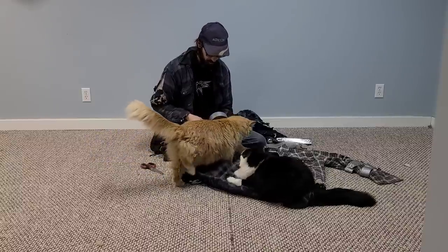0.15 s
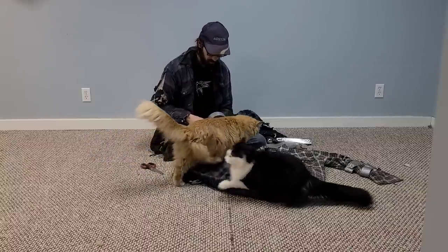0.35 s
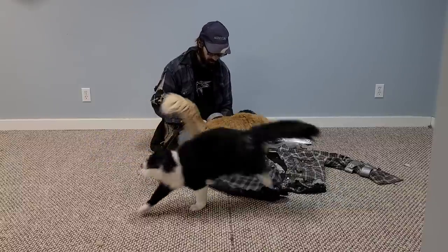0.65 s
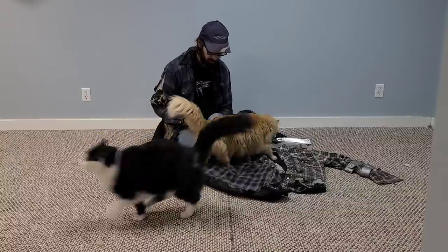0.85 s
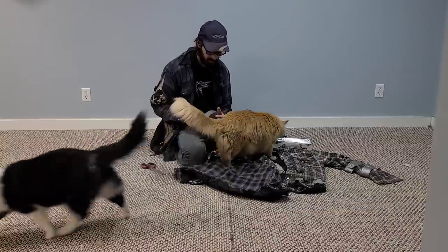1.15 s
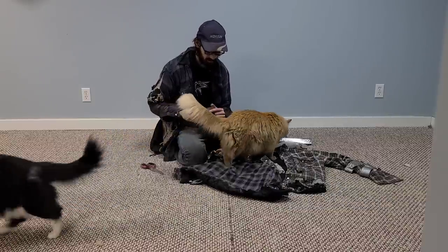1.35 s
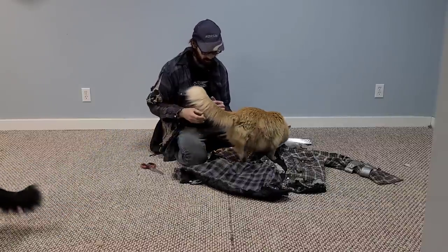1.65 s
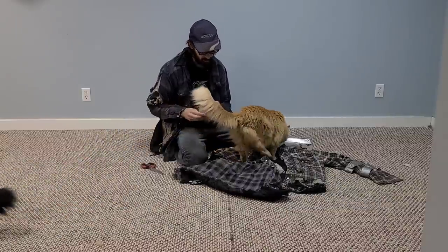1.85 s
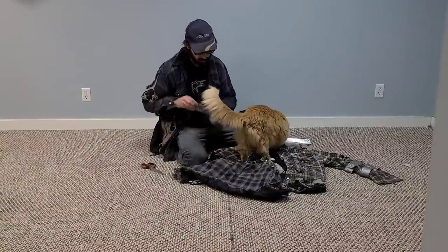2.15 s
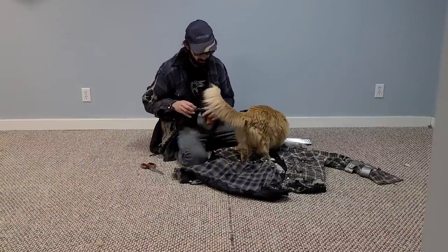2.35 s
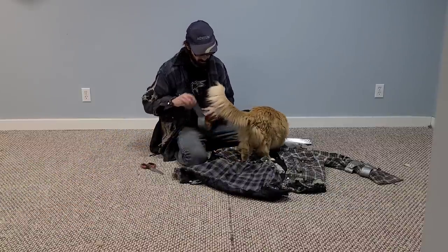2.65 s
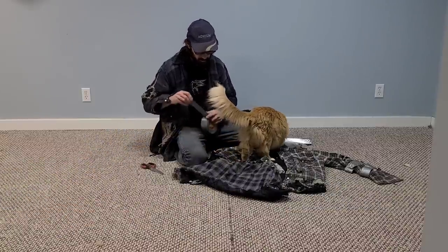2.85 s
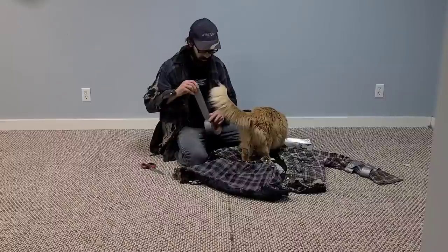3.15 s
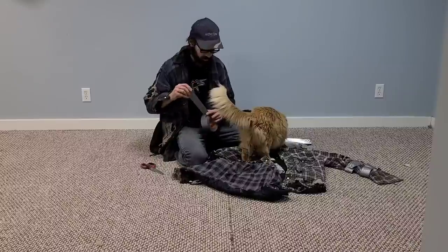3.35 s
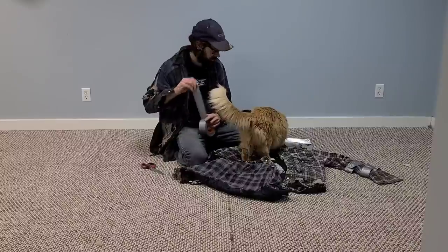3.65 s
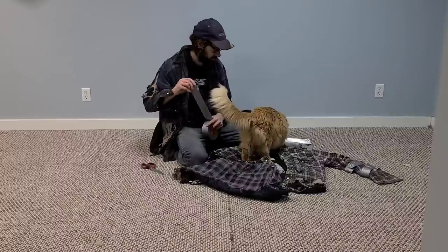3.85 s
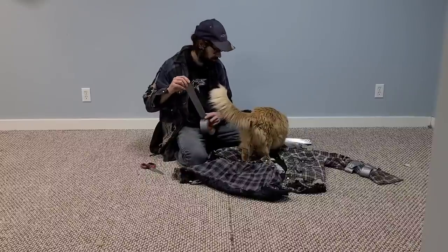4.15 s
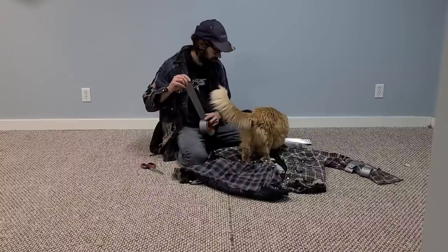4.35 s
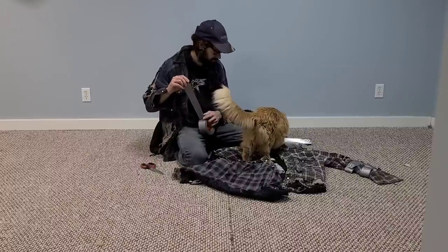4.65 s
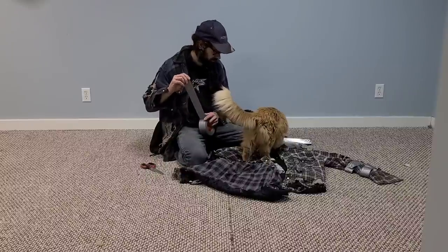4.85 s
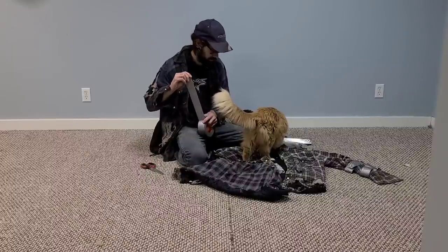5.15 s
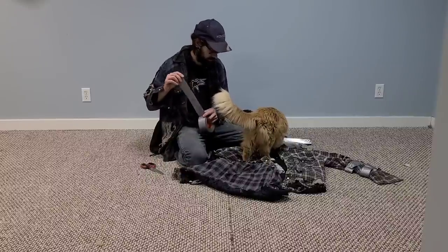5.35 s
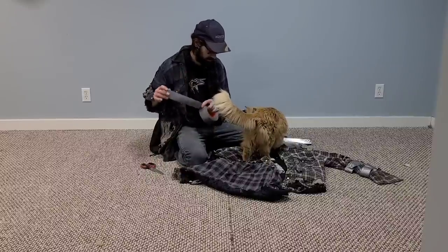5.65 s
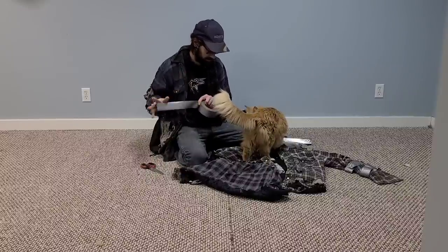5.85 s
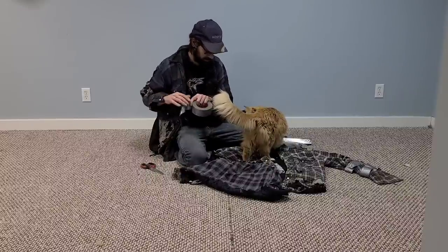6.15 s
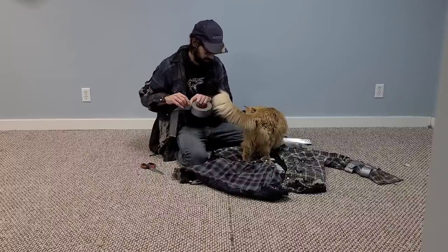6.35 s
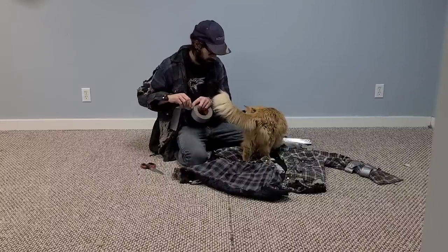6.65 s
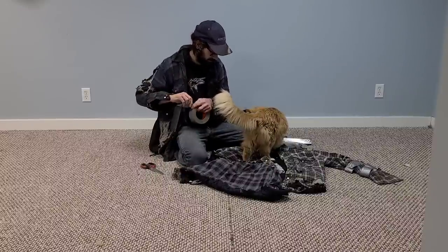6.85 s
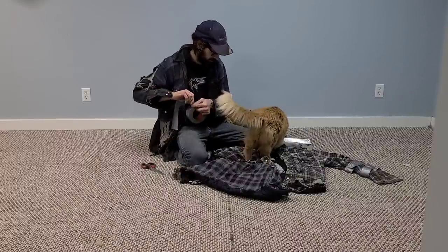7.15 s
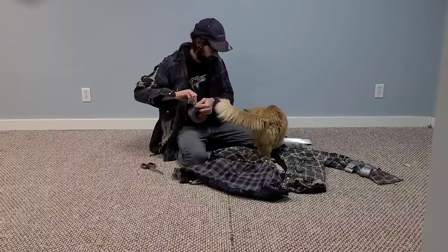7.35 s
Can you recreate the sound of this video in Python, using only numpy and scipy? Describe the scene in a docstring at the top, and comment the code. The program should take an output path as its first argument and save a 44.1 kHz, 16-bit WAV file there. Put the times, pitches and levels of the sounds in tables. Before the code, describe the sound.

A low electrical hum and soft ventilation fill a small room, heard in stereo from a few metres away. After a light tick and a single dull thump, someone eases duct tape from a roll in separate little bursts: pops, crackles, a quick squeal and a short groan, mixed with sleeve rustle. The handling turns faint, then one sharp, squealing rip closes it. Hard walls add a short echo.

```python
"""Duct tape is worked off its roll in a small carpeted room, a few metres from a stereo microphone.
Snapping threads of glue make the stretched strip pop, crackle and rip; stick-slip makes it squeal and
groan. The strip crinkles, hands and sleeves rub, and one dull thump is the loudest sound.
Hard walls answer each burst, over a steady mains hum, a faint drone and the rush of ventilation."""
import sys
import numpy as np
from scipy import signal
from scipy.fft import rfft, irfft
from scipy.io import wavfile
from scipy.ndimage import uniform_filter1d

SR = 44100
rng = np.random.default_rng(int(sys.argv[2]) if len(sys.argv) > 2 else 0)


def put_to_file(sound):
    """Save the sound as 16-bit audio at rate SR, in the file named by the first command-line argument."""
    columns = np.atleast_2d(sound).T  # one column per channel
    safe = np.clip(columns, -1, 1)
    whole_steps = np.round(safe * 32767)
    wavfile.write(sys.argv[1], SR, whole_steps.astype(np.int16))


N = 330109
TOP_HZ = 15900


def undb(db):
    """Decibels to gain."""
    return 10 ** (np.asarray(db) / 20)


def unit_rms(x):
    """Scale to rms 1."""
    return x / np.sqrt(np.mean(x ** 2))


def at_hz(points, hz):
    """Read (Hz, value) points on a log-frequency axis."""
    point_hz, value = np.transpose(points)
    return np.interp(np.log(hz + 1), np.log(point_hz), value)


def colour(x, points, size=4096):
    """Minimum-phase filter with a (Hz, dB) response."""
    gain = undb(at_hz(points, np.fft.rfftfreq(size, 1 / SR)))
    cepstrum = irfft(np.log(gain))
    cepstrum[1:size // 2] *= 2
    cepstrum[size // 2 + 1:] = 0
    return signal.oaconvolve(x, irfft(np.exp(rfft(cepstrum))))[:len(x)]


def cut(x, hz, kind, order=2):
    """High- or low-pass."""
    return signal.sosfilt(signal.butter(order, min(hz, TOP_HZ), kind, fs=SR, output="sos"), x)


def wander(rate_hz):
    """Smooth random curve, rms 1."""
    hold = max(int(SR / rate_hz), 1)
    steps = np.repeat(rng.standard_normal(N // hold + 1), hold)
    return unit_rms(uniform_filter1d(steps, hold)[:N])


def burst(peak_s, rise_s, fall_s):
    """Envelope: exponential rise to 1, exponential fall."""
    t = np.arange(N) / SR - peak_s
    return np.exp(np.maximum(np.minimum(t / rise_s, -t / fall_s), -40))


def swells(rows):
    """Sum of symmetric bursts."""
    return sum(undb(db) * burst(peak_s, width_s, width_s) for peak_s, width_s, db in rows)


def add(out, start_s, x):
    """Mix x into out at start_s."""
    i = int(start_s * SR)
    out[i:i + len(x)] += x[:N - i]


# Mains and appliance tones. Each row: frequency in Hz, rms level in dB.
HUM_TONES = [(60, -74.5), (120, -57), (284, -73.5), (355, -78.5), (507, -79.5), (765, -77.5),
             (14196, -95.5)]
# Each row: peak time in seconds, rise and fall in seconds, level in dB.
DRONE_SWELLS = [(1.55, 0.29, -62.5), (4.13, 0.11, -61.5), (7.22, 0.17, -60.5)]
# Ventilation and microphone hiss. Each row: frequency in Hz, relative level in dB.
AIR_SPECTRUM = [(20, -28.5), (58, 2.5), (150, 2.5), (215, -6.5), (290, -3), (450, -8.5), (780, -9.5),
                (900, -16.5), (1250, -12.5), (2100, -21), (3300, -20), (5400, -33.5), (8000, -41),
                (15000, -42.5)]

def background(air_db=-61, drone_hz=362, wobble=0.03026, balance_db=-0.3):
    """Steady mains hum, a wavering drone and ventilation whose bass is alike in both channels."""
    t = np.arange(N) / SR
    hum = sum(np.sqrt(2) * undb(db) * np.sin(2 * np.pi * hz * t) for hz, db in HUM_TONES)
    drone_phase = 2 * np.pi * drone_hz * np.cumsum(1 + wobble * wander(60)) / SR
    drone = unit_rms(np.sin(drone_phase)) * swells(DRONE_SWELLS)
    mid, side = (unit_rms(colour(rng.standard_normal(N), AIR_SPECTRUM)) for _ in range(2))
    side = colour(side, [(100, -8), (300, -7), (800, -1), (2000, 0)])
    air = undb(air_db) * np.array([mid + side, mid - side])
    return (air + hum + drone) * undb(np.array([[balance_db], [-balance_db]]) / 2)


# Each row: left delay in seconds, right delay in seconds, gain in dB.
WALL_ECHOES = [(.0056, .0058, -7), (.0130, .0132, -4), (.0172, .0166, -9), (.0199, .0203, -8)]
# Each row: frequency in Hz, time to fall 60 dB in seconds.
TAIL_T60 = [(150, .4), (400, .39), (1000, .29), (3000, .27), (6000, .22), (14000, .19)]
# Each row: frequency in Hz, left minus right in dB.
MIC_IMBALANCE = [(120, 0.5), (300, -4), (500, 0.5), (1100, -4), (1500, -9), (2100, -4), (3000, 2.5),
                 (4000, 3), (5700, 7), (8000, -3), (11000, -1)]

def room(spread, beamed, tail_db=3.5, beamed_db=-8, build_s=0.0053, right_lag_s=.00009, size=22050):
    """Direct sound, wall echoes and diffuse tail; sound beamed at the microphone stirs the room less."""
    t, hz = np.arange(size) / SR, np.fft.rfftfreq(size, 1 / SR)
    centres_hz = np.geomspace(100, 16000, 9)
    bands = [np.interp(np.log(hz + 1), np.log(centres_hz), row) for row in np.eye(len(centres_hz))]
    decays = [np.exp(-np.log(1000) * t / t60_s) for t60_s in at_hz(TAIL_T60, centres_hz)]
    tail_gain = undb(at_hz([(400, 0.98), (1500, -.5), (4000, -0.13), (12000, 1.5)], hz))
    mid, side = rfft(rng.standard_normal((2, size)))
    coherence = at_hz([(300, 0.98), (1000, 0.11), (2500, 0.033)], hz)  # long waves reach both sides alike
    out = []
    for channel, sign in enumerate((1, -1)):
        field = mid * np.sqrt((1 + coherence) / 2) + sign * side * np.sqrt((1 - coherence) / 2)
        tail = sum(irfft(field * tail_gain * band) * decay for band, decay in zip(bands, decays))
        tail *= 1 - np.exp(-(t / build_s) ** 2)
        walls = undb(tail_db) * tail / np.linalg.norm(tail)
        for *delays_s, db in WALL_ECHOES:
            walls[int(delays_s[channel] * SR)] += undb(db)
        heard = signal.oaconvolve(spread + undb(beamed_db) * beamed, walls)[:N]
        add(heard, channel * right_lag_s, spread + beamed)
        out.append(colour(heard, [(f, sign * db / 2) for f, db in MIC_IMBALANCE]))
    return np.array(out)


# Each row: peak time in seconds, rise and fall in seconds, level in dB.
RUSTLE_SWELLS = [(.58, 0.033, -68.5), (2.08, 0.035, -62), (2.234, 0.013, -44), (2.774, 0.02, -48),
                 (2.954, 0.01, -50.5), (3.084, 0.0098, -53.5), (3.86, 0.021, -62.5), (4.75, .08, -83),
                 (5.82, 0.022, -63.5)]
# Each row: frequency in Hz, relative level in dB.
CLOTH_SPECTRUM = [(100, -22), (250, 1.5), (480, 4.5), (850, -4), (1300, -11.5), (2200, -16), (5000, -41)]

def rustles(grain_db=3.0):
    """Dull, grainy friction of hands and sleeves against the roll."""
    friction = rng.standard_normal(N) * undb(grain_db * wander(300))
    return unit_rms(colour(friction, CLOTH_SPECTRUM)) * swells(RUSTLE_SWELLS)


# Each row: frequency in Hz, relative level in dB.
BLOW_SPECTRUM = [(60, -25), (170, -10.5), (235, -13), (400, 9), (640, 2.5), (880, -4), (1200, -0.5),
                 (1600, -4.5), (1900, -9.5), (2800, -15.5), (5000, -30.5), (9000, -38.5), (15000, -43)]
# Each row: frequency in Hz, level in dB re the blow's peak, time to fall 60 dB in seconds.
RING_MODES = [(314, -35, 0.073), (410, -26.5, 0.13), (462, -28, 0.11), (628, -27, 0.089),
              (1300, -29, 0.049)]

def thump(start_s=.9325, blow_db=-9, size=16384):
    """One soft blow and the low modes that it leaves ringing."""
    out, t = np.zeros(N), np.arange(size) / SR
    blow = colour(signal.unit_impulse(size), BLOW_SPECTRUM)
    blow /= np.abs(blow).max()
    ring = sum(undb(db) * np.cos(2 * np.pi * hz * t) * np.exp(-np.log(1000) * t / t60_s)
               for hz, db, t60_s in RING_MODES)
    add(out, start_s, -undb(blow_db) * (blow + cut(ring, 2500, "low")))
    return out


GROAN_PEAK_S, GROAN_RISE_S, GROAN_FALL_S, GROAN_DB = 3.04, 0.026, 0.021, -31.5
# Each row: harmonic number, relative level in dB.
GROAN_HARMONICS = [(1, -6), (2, -23), (3, -29), (4, -36)]

def groan(slack_hz=277, taut_hz=440.6, tighten_at_s=3.033, tighten_s=0.0077, jitter=0.031, rough_db=4.0):
    """Slow stick-slip on the taut strip: a dull, rough tone that rises with the tension."""
    tension = (1 + np.tanh((np.arange(N) / SR - tighten_at_s) / tighten_s)) / 2
    hz = slack_hz + (taut_hz - slack_hz) * tension
    phase = 2 * np.pi * np.cumsum(hz * (1 + jitter * wander(400))) / SR
    tone = unit_rms(sum(undb(db) * np.sin(k * phase) for k, db in GROAN_HARMONICS))
    envelope = burst(GROAN_PEAK_S, GROAN_RISE_S, GROAN_FALL_S)
    return tone * undb(GROAN_DB + rough_db * wander(200)) * envelope


# Each row: start in seconds, peak in dB, low and high edges in Hz, then for the crackle in rips():
# level in dB, fall in seconds, brightness in dB.
TAPE_POPS = [(.5050, -34, 1100, 15000, -53.5, 0.0059, 2.5), (2.0130, -35, 5000, 15000, -61, 0.0044, 6),
             (2.0216, -21.5, 2720, 12900, -55, 0.065, 0.5), (2.1903, -37.5, 910, 5000, -61, .008, -8),
             (2.2040, -18.5, 300, 1700, -64.5, 0.024, -10), (2.6918, -28, 1090, 2360, -53.5, 0.022, 2),
             (3.7250, -15, 134, 2220, -42.5, 0.038, -6.5), (5.8852, -35, 800, 1950, -66, 0.0083, 0),
             (6.519, -40, 1300, 2980, -68.5, .015, -6), (7.177, -42, 2740, 4140, -62.5, .013, -6)]

def pops(tick_db=-17, size=2048):
    """A sudden release flicks the strip like a drum skin; the glue adds a sharp tick."""
    out, kick = np.zeros(N), signal.unit_impulse(size)
    tick = undb(tick_db) * cut(kick, 2800, "high")
    for start_s, db, low_hz, high_hz, *_ in TAPE_POPS:
        skin = cut(cut(kick, low_hz, "high"), high_hz, "low", order=3)
        add(out, start_s, -undb(db) * (skin / np.abs(skin).max() + tick))
    return out


# Each row: squeal peak time in seconds, then for rips(): rise in seconds, level in dB, brightness in dB;
# last, squeal pitch in Hz, squeal level in dB.
TAPE_PULLS = [(2.740, 0.013, -42, -11, 1160, -27.5), (5.806, 0.0087, -63.5, -2.5, 1446, -51.5),
              (5.884, 0.031, -53.5, -2, 1306, -45), (6.523, .014, -71, -7, 1648, -55),
              (7.481, 0.011, -28, 0, 1378, -28)]
# Each row: harmonic number, level in dB re the fundamental at 0 dB brightness.
SQUEAL_HARMONICS = [(2, -1.5), (3, -12.5), (4, -0.5), (6, -1)]

def squeals(rise_s=0.0082, fall_s=0.0073, jitter=.10, overtone_db_per_db=3.7):
    """At the height of each pull the peel line sticks and slips almost regularly for a few cycles."""
    out, t = np.zeros(N), np.arange(N) / SR
    uneven_t = np.cumsum(1 + jitter * wander(1500)) / SR
    for peak_s, _, _, bright_db, hz, db in TAPE_PULLS:
        span = np.abs(t - peak_s) < .1
        phase = 2 * np.pi * hz * uneven_t[span]
        overtones = sum(undb(part_db) * np.sin(k * phase) for k, part_db in SQUEAL_HARMONICS)
        tone = np.sin(phase) + undb(overtone_db_per_db * bright_db) * overtones
        out[span] += undb(db) * burst(peak_s, rise_s, fall_s)[span] * tone
    return out


CRACKLE_LAG_S, CRACKLE_RISE_S = 0.0034, 0.0068
PULL_LAG_S, PULL_FALL_S = 0.0053, .013
# Strip, backing and glue line. Each row: frequency in Hz, relative level in dB.
DRUM_SPECTRUM = [(50, -20.5), (150, -5.5), (280, 8), (500, -4.5), (850, -6.5), (1500, -24), (4000, -67)]
RASP_SPECTRUM = [(200, -22), (650, -21), (1000, -3), (1200, -1.5), (1450, 1), (1950, 0.5), (2900, 3),
                 (4500, -4.5), (8000, -17.5), (15000, -29.5)]
FIZZ_SPECTRUM = [(400, -32), (1500, -24), (3000, 2.5), (4500, -1.5), (5700, 3.5), (7500, 4), (10000, 0),
                 (15000, 0)]
# Fingers crinkle the strip. Each row: peak time in seconds, rise and fall in seconds, level in dB.
CRINKLE_SWELLS = [(.660, .009, -68), (1.634, 0.013, -62.5), (2.305, 0.018, -63), (2.382, .012, -58),
                  (2.55, 0.06, -72), (2.956, 0.054, -67.5), (3.055, 0.014, -69), (3.948, 0.057, -70),
                  (4.05, 0.036, -68), (6.365, 0.02, -69.5)]

def rips(snaps_per_s=1400, spread_db=2.5, patchy_db=4.5, groan_drum_db=-13.5):
    """Glue threads snap in uneven clusters: the strip drums, its backing rasps, the glue line fizzes."""
    snaps = (rng.random(N) < snaps_per_s / SR) * rng.choice([-1, 1], N)
    strength_db = spread_db * np.minimum(rng.exponential(size=N), 4)
    snaps = snaps * undb(strength_db + patchy_db * wander(200))
    snaps /= np.sqrt(uniform_filter1d(snaps ** 2, size=900) + 1e-6)  # the pull alone sets the energy
    drum, rasp, fizz = (unit_rms(colour(snaps, spectrum))
                        for spectrum in (DRUM_SPECTRUM, RASP_SPECTRUM, FIZZ_SPECTRUM))

    def peel(bright_db, drum_db=-20.5, fizz_top_hz=12600, octaves_per_db=0.2):
        """Brightness trades drumming for a louder, higher fizz."""
        glue = cut(fizz, fizz_top_hz * 2 ** (bright_db * octaves_per_db), "low", order=1)
        return undb(drum_db - 2 * bright_db) * drum + rasp + undb(bright_db) * glue

    crackles = sum(undb(db) * burst(start_s + CRACKLE_LAG_S, CRACKLE_RISE_S, fall_s) * peel(bright_db)
                   for start_s, *_, db, fall_s, bright_db in TAPE_POPS)
    pulls = sum(undb(db) * burst(peak_s + PULL_LAG_S, rise_s, PULL_FALL_S) * peel(bright_db)
                for peak_s, rise_s, db, bright_db, *_ in TAPE_PULLS)
    crinkles = swells(CRINKLE_SWELLS) * peel(bright_db=-4)
    under_groan = undb(GROAN_DB + groan_drum_db) * burst(GROAN_PEAK_S, GROAN_RISE_S, GROAN_FALL_S) * drum
    return crackles + pulls + crinkles + under_groan


def scene():
    """Tape, rustles and thump in the room, over the background."""
    spread = thump() + pops() + rips() + rustles()
    beamed = squeals() + groan()  # off the flat of the strip
    return room(spread, beamed) + background()


def record(dry):
    """Steep low-pass at TOP_HZ."""
    return signal.sosfilt(signal.ellip(10, .1, 70, TOP_HZ, fs=SR, output="sos"), dry)


dry = scene()
out = record(dry)
put_to_file(out)
```